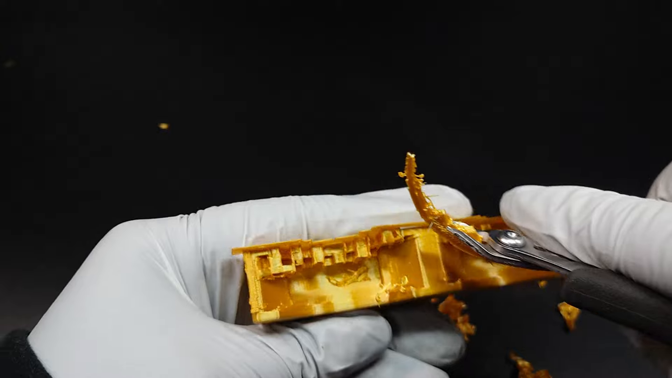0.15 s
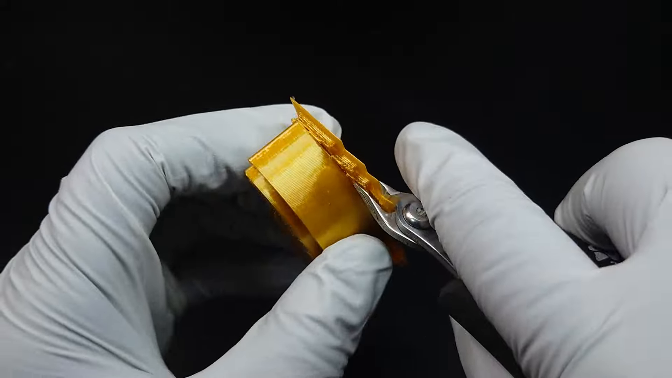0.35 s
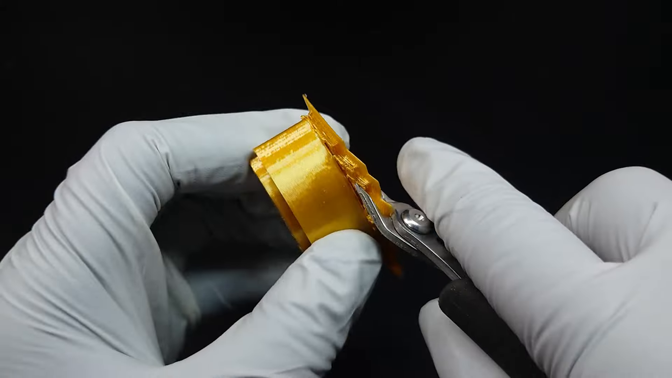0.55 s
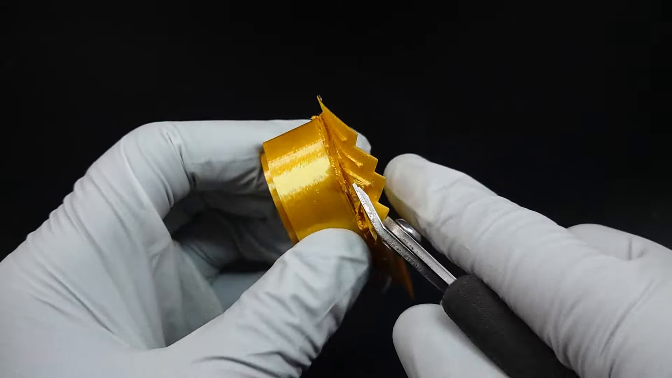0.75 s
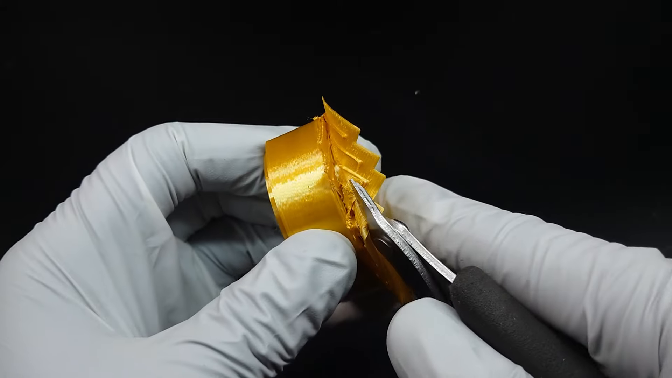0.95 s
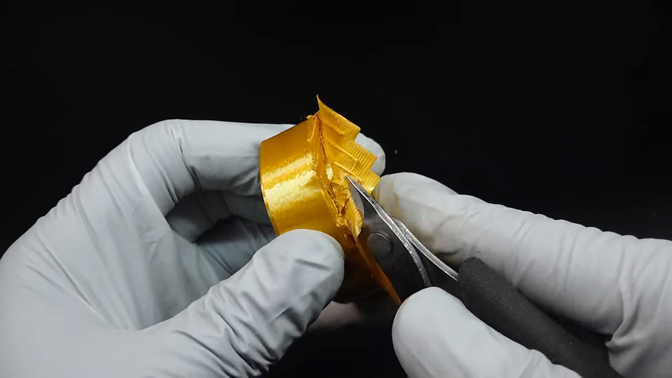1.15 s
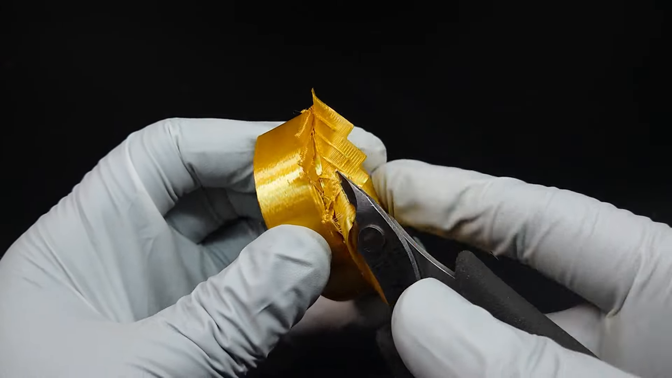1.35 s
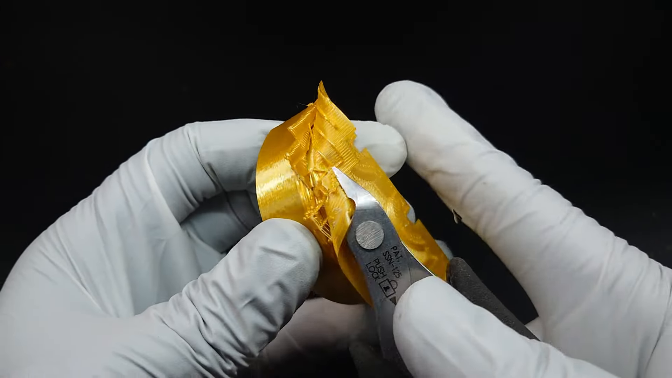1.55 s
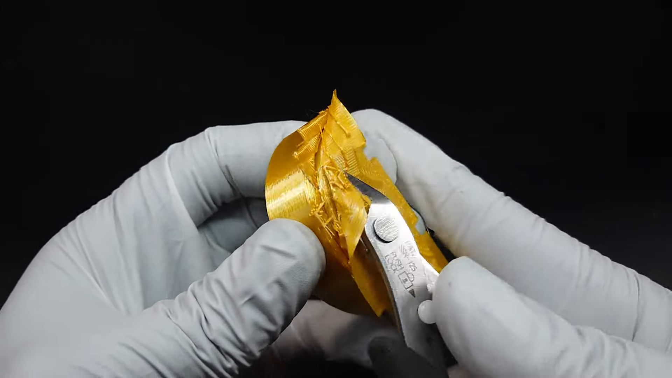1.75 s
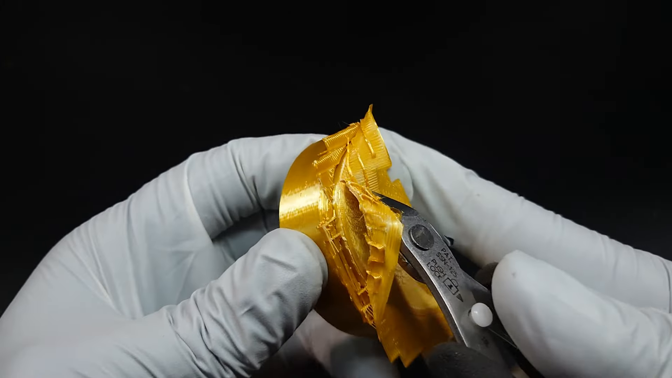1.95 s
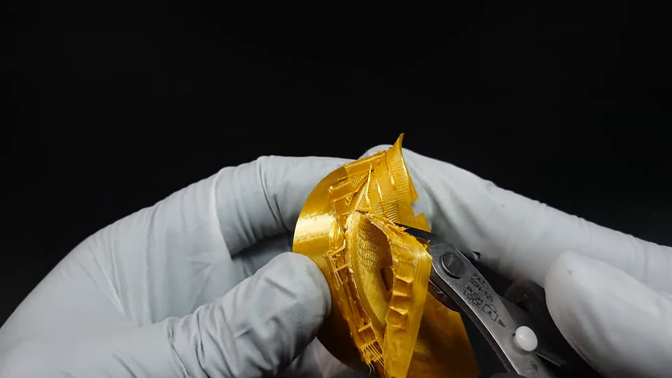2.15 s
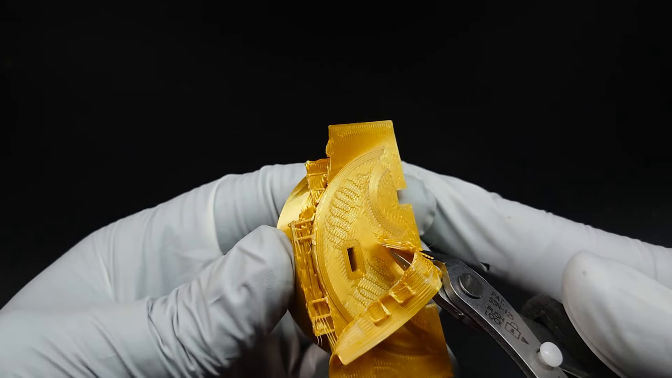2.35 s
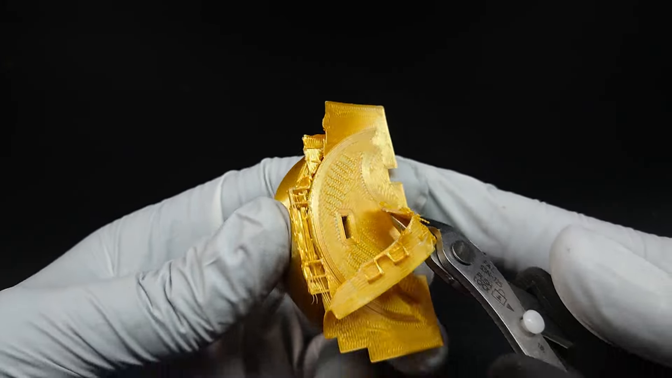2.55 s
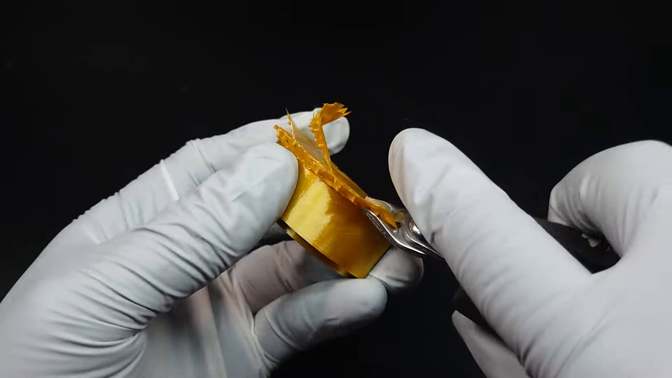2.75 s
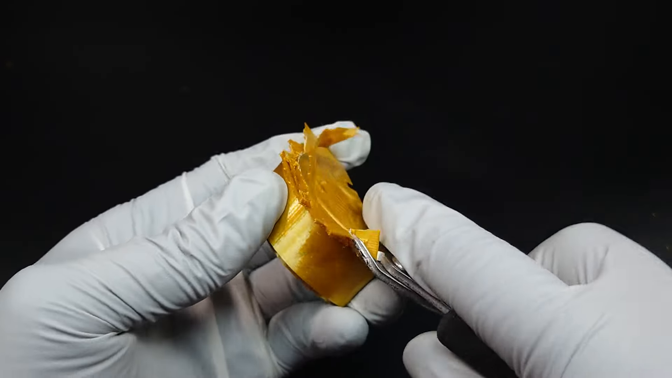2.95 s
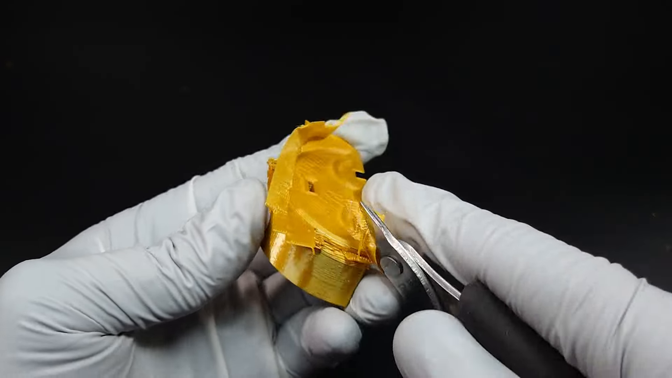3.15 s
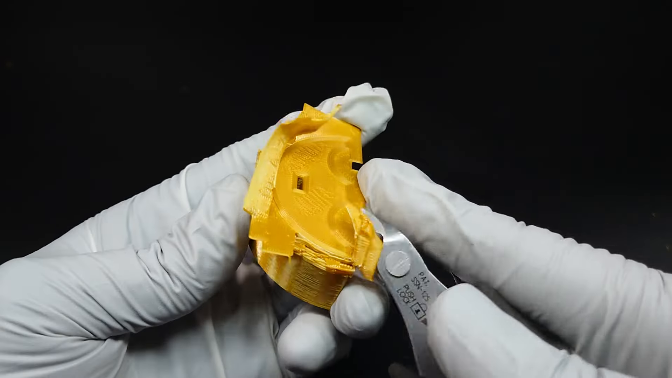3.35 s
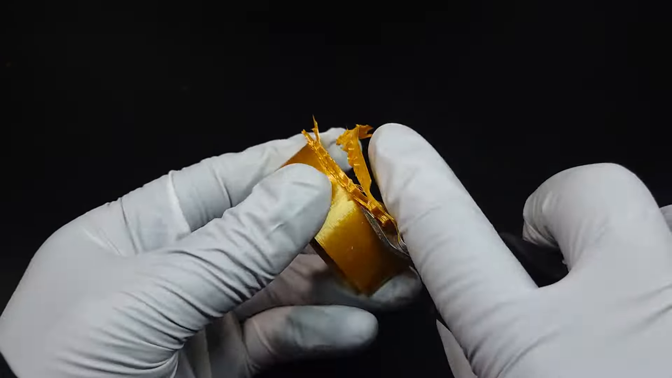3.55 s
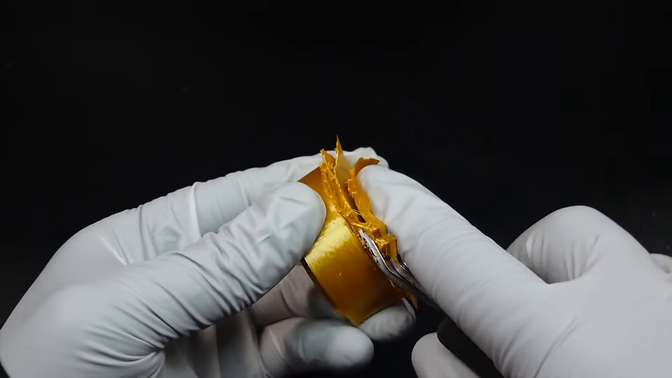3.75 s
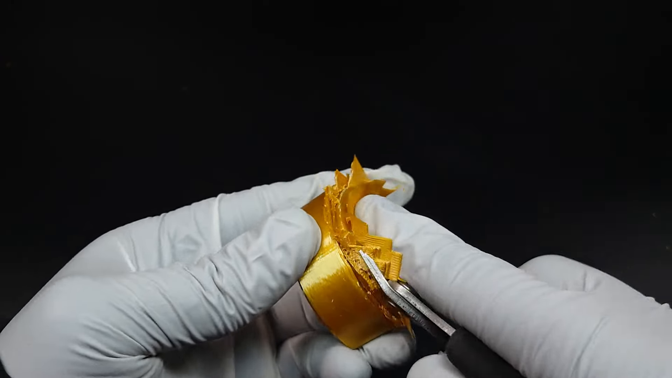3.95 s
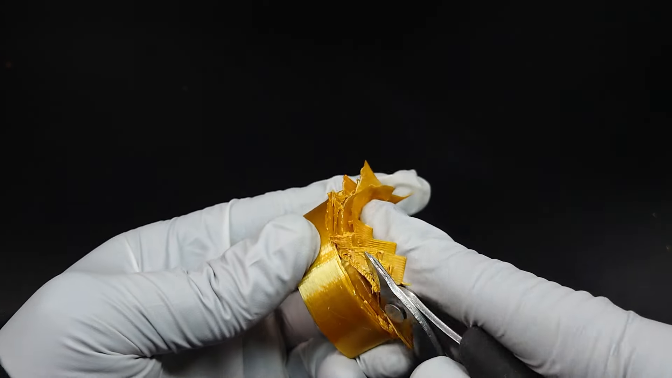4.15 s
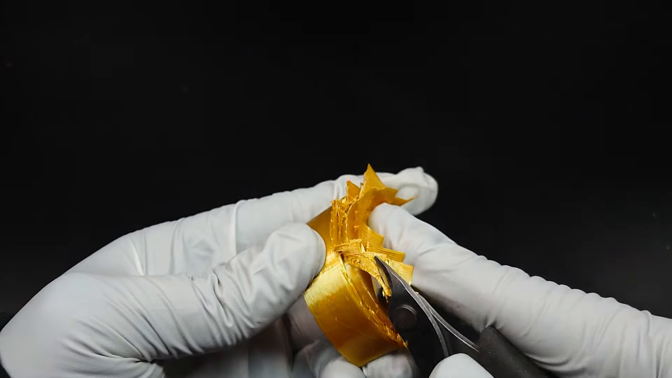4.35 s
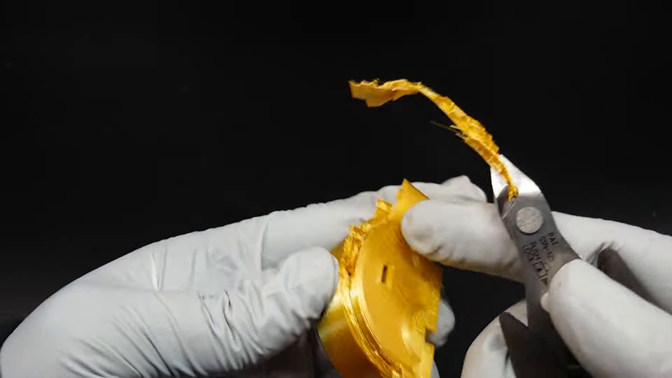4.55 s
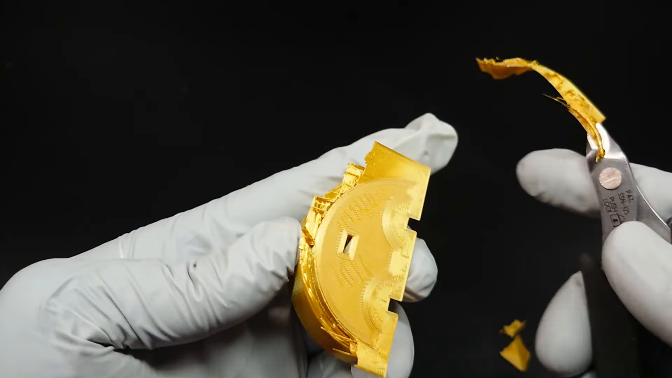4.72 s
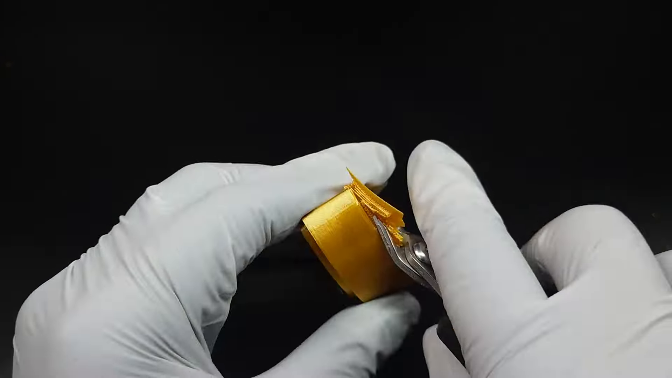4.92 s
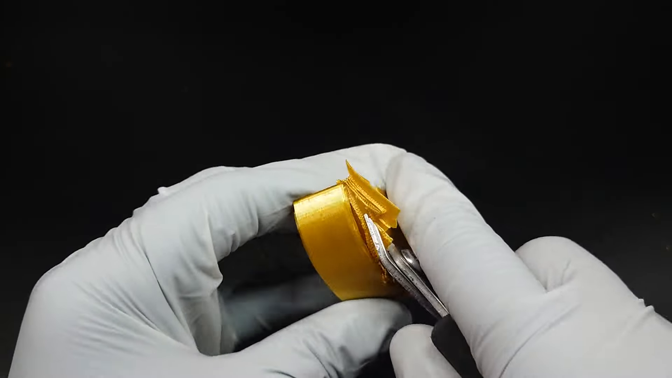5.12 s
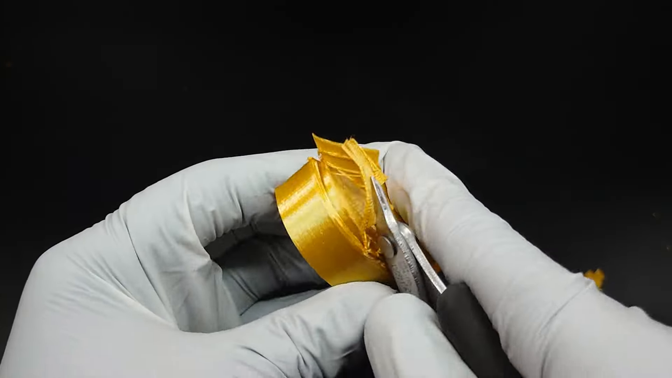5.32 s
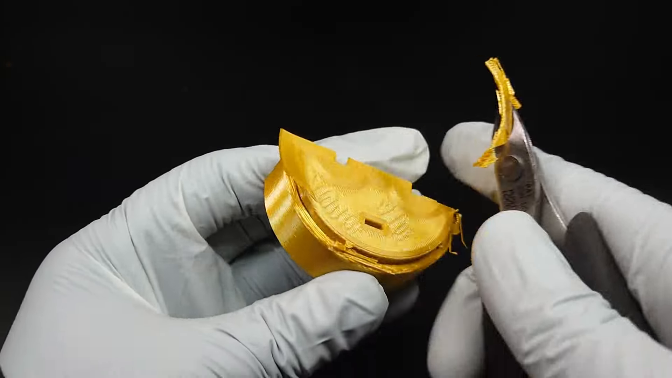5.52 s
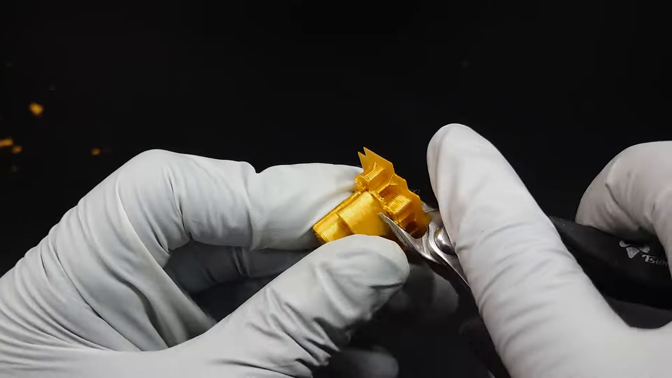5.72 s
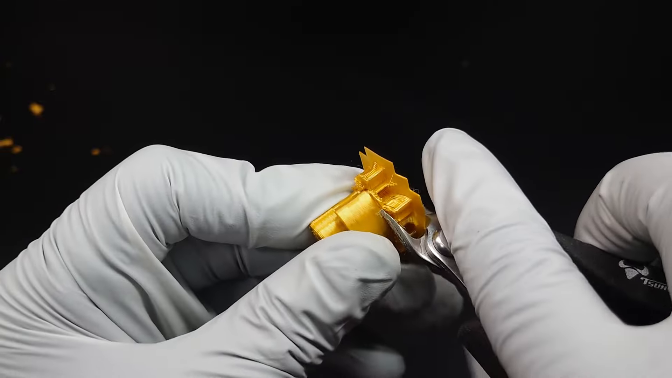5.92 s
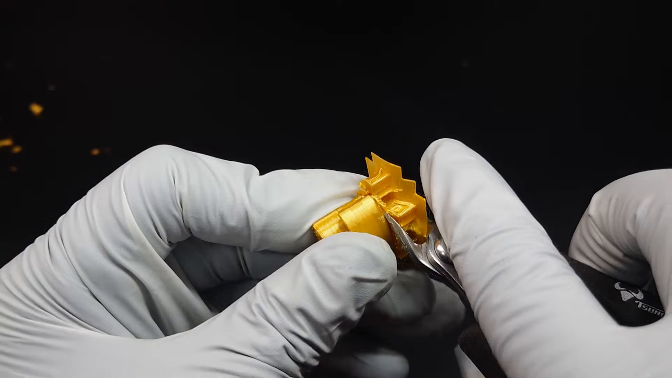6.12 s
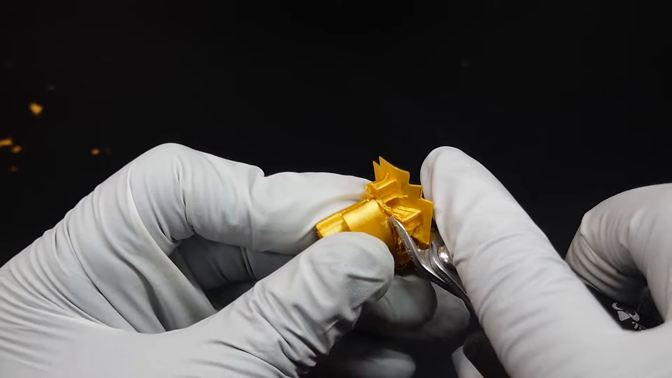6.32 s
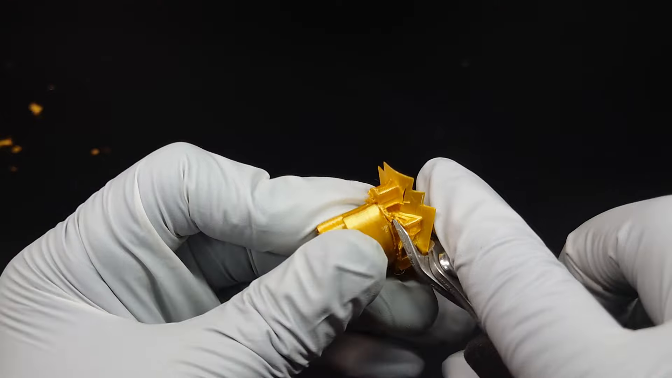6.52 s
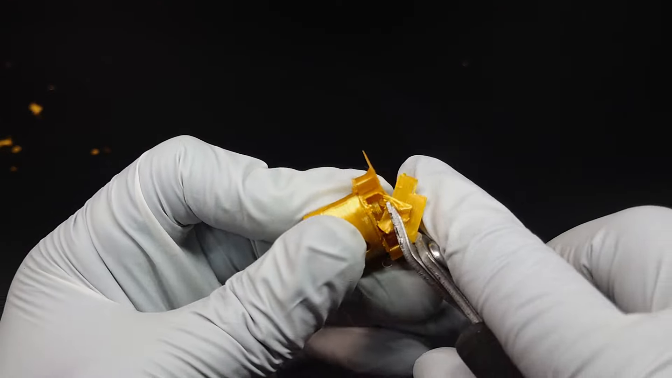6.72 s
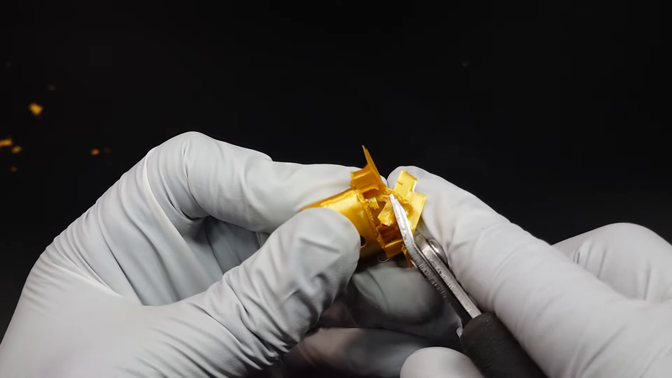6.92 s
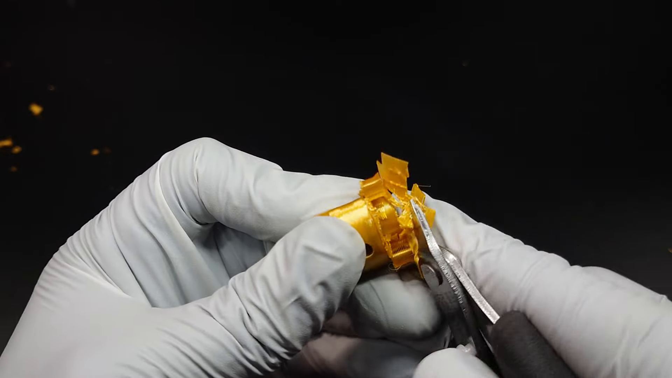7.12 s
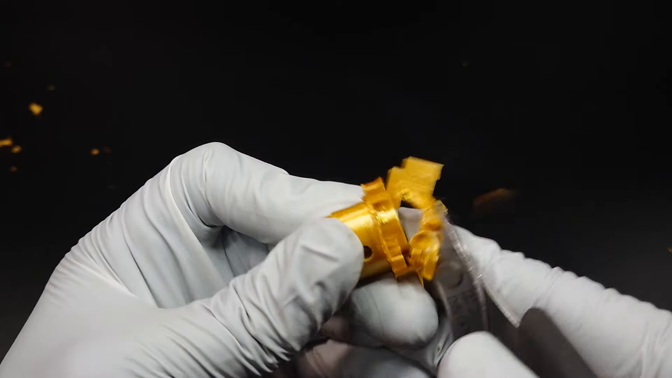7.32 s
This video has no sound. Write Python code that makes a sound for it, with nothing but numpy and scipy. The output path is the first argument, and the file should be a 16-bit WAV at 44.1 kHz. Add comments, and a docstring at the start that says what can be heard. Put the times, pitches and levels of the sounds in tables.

```python
"""Pliers breaking brittle plastic

Small pliers snap and tear supports off printed plastic parts, close to a stereo microphone on a workbench.
Each fracture is a noise burst of milliseconds that rings two modes of the piece and a small, dry room.
Between them come light ticks (jaw taps and small, weak cracks), creaking strands, hand thuds and glove rubs,
over hush and two thin tones.
The left microphone pops and rumbles, early and again near the end; the loudest peaks clip."""
import sys
import numpy as np
from scipy import signal
from scipy.fft import rfft, irfft
from scipy.io import wavfile
from scipy.ndimage import uniform_filter1d

SR = 44100
rng = np.random.default_rng(int(sys.argv[2]) if len(sys.argv) > 2 else 0)


def bounce(signal):
    """Save signal as a 16-bit WAV file at the path given by the first command-line argument."""
    frames = np.transpose(np.atleast_2d(signal))
    limited = np.clip(frames, -1, 1)
    pcm = np.round(limited * 32767).astype(np.int16)
    wavfile.write(sys.argv[1], SR, pcm)


N = 325458
CUTOFF_HZ = 15900
BURST = 2048  # samples that hold one crack
HZ = np.fft.rfftfreq(BURST, 1 / SR)

# fractures: start_s, level_db, decay_ms, body_db, brightness_db,
# low_ring_hz, low_ring_db, high_ring_hz, high_ring_db, left_minus_right_db
FRACTURES = [(0.4429, -4, 2.4, -11, 12.5, 4540, 10, 8020, 20.5, 10.5),
             (0.499, 2.5, 4.3, -9, -1, 4400, 25.5, 8020, 23.5, 5),
             (0.711, 15, 2, -14, -2, 2320, 19.5, 7650, 16.5, -0.5),
             (0.7706, 2.5, 1.9, -4, 7, 4560, 25, 7940, 27.5, -1),
             (0.821, 12, 4.3, -9, -4, 2970, 12, 8190, 12, -2.5),
             (0.9173, 8, 2.5, -24, 1, 4900, 21.5, 8780, 6.5, 1.5),
             (1.484, 9, 1.9, 8, 7.5, 2624, 15.5, 14660, 10, -5),
             (1.5055, -0.5, 3.7, -6, -6, 5200, 15.5, 8900, 7, 2),
             (1.8421, 6.5, 2.3, 12, 19, 4370, 9, 10500, 6, 2),
             (1.849, 3, 3.2, 1.5, 10.5, 2100, -1, 7300, 10, -14),
             (1.8594, 6, 1.8, -14, 23.5, 5700, 10, 7750, 35, -14.5),
             (1.9002, 9, 3.5, 14, 18.5, 2440, 14, 7900, 21, -3),
             (1.9305, 6, 1.5, -2.5, 8, 2230, 5, 8700, 13, -0.5),
             (2.143, 5, 2.9, -3.5, 2.5, 4630, 9.5, 10650, 8, -6),
             (2.2598, 4, 5.4, -7.5, 3, 4480, 0, 11650, 14.5, -4),
             (2.3492, 11.5, 4.1, 0.5, 11, 5770, 10, 10780, 9.5, 7),
             (2.3514, 9.5, 0.84, 24.5, 4.5, 3540, 11.5, 8300, 17.5, 2.5),
             (2.3572, -0.5, 3, 6.5, 13, 4450, -1.5, 7600, 42.5, 8),
             (2.8281, 11.5, 4.5, 0.5, 12.5, 4540, 6, 11900, 14.5, 0.5),
             (2.882, 11.5, 1, -14.5, -8, 4470, 15.5, 7780, 11.5, -1.5),
             (3.026, 9.5, 3, -10, -1, 4580, 9.5, 9900, 6.5, -1),
             (3.0868, 6, 3, -10, -4, 4400, 7, 9500, 9.5, 0),
             (3.1482, 13.5, 1.5, -2, 1, 5550, 12.5, 14400, 8, 3.5),
             (3.1528, 0.5, 2.9, 3, -8, 6140, 17.5, 14300.0, 17, -1),
             (3.4858, 4, 3.7, 0, -11, 4030, 15.5, 10200, 6.5, 5),
             (3.703, 2, 3.8, -18, -5, 2530, 11, 9260, 14, -2),
             (3.9102, 9, 1.9, -12.5, 5, 3850, 6, 10720, 8, 3),
             (4.042, -6.5, 1.3, -7, 1, 2670, 18.5, 8330, 14, 4),
             (4.0726, 7, 2.1, -5, -5.5, 3460, 8.5, 8100, 9, 3.5),
             (4.1839, 0, 2.9, -5, -2.5, 4270, 19, 9800, 8.5, 1),
             (4.296, 2.5, 2, 0, 6, 4280, 7.5, 14300, 7, 3.5),
             (4.3756, -11, 1.4, -21, 8, 4360, 29.5, 7380, 19, 3),
             (4.527, 14.5, 0.81, -8, 4.5, 3430, 9.5, 8030, 8.5, -4.5),
             (4.6205, -5.5, 3.8, 5, -12.5, 3960, 1, 8400, 13.5, -5),
             (4.9726, -8.5, 3.7, 4, 8.5, 888, 22, 7700, 6, 5),
             (5.0037, -3.5, 4.2, -7, 4.5, 4940, 4.0, 9540.0, 0, 5.5),
             (5.0275, -8, 4.9, -3, -12, 6400, 21, 10600, 15, -1),
             (5.046, 1, 2.9, -1.5, 6.5, 2600, 9, 9900, 12, 4),
             (5.0771, 2.5, 4.7, -5, -0.5, 3900, 10, 10350, 12, 0.5),
             (5.2373, 9, 3.2, -13, -8.5, 2770, 7, 14300.0, 6, 1),
             (5.2875, 11, 0.9, 7, 9.5, 2770, 9.5, 8030, 14, 2.5),
             (5.3466, 1, 3.7, 5.5, -5, 3480, 9, 9600, 2, 3.5),
             (5.4458, -2.5, 1.3, 1, -7, 4620, 6.5, 10400, 0.5, 3.5),
             (5.4756, 5, 8.1, 5.5, -1.5, 5750, 15, 14330, 11.5, 2.5),
             (5.783, -8.5, 2.8, -1.5, 16, 4650.0, 20.5, 13600, 14, 10.5),
             (5.8775, -6.5, 2, 1, 14.5, 4580, 27, 13300, 16.5, 12),
             (6.0111, -4, 1.94, -18, 13, 4630, 29, 12740, 12.5, 13),
             (6.2093, 3.5, 1.45, -18, 16.5, 4770, 26.5, 13660, 9.5, 4.5),
             (6.2434, 7.5, 3.5, -32.5, -1.5, 4610, 24.5, 8500, 6.5, 8),
             (6.2606, 2.5, 6.9, -10, -3, 2100, 16, 7700, 8, 2.5),
             (6.3353, 3, 3.6, -20, 5, 4550, 25, 8920, 10, 3.5),
             (6.491, -5.5, 2.5, -7.5, 0.5, 2220, 15, 7650, 7, 1.0),
             (6.6153, 0.5, 2.9, -1.5, 8.5, 5800, 11.5, 7660, -2, -0.5),
             (6.7118, 11, 0.65, -3.5, 0, 5320, 12.5, 13400, 6.5, -8.5),
             (6.93, 7.5, 1, -6, 26, 5150, 26, 8190, 29, 0),
             (7.1566, 5.5, 0.98, 15, 5.5, 5700, 19.5, 11020, 10.5, 11.5),
             (7.1751, 3.5, 6, -2, 6.5, 5730, 19.5, 10250, 12, 3.5)]


def from_db(db):
    """Decibels to amplitude gain."""
    return 10 ** (np.asarray(db) / 20)


def at_hz(points, hz):
    """Interpolate (Hz, value) points along a log-frequency axis."""
    log_hz, values = np.transpose([(np.log(f), v) for f, v in points])
    return np.interp(np.log(hz + 1), log_hz, values)


def add(out, start_s, sound):
    """Mix a sound in at a given time."""
    start = int(start_s * SR)
    out[..., start:start + sound.shape[-1]] += sound[..., :N - start]


def noise(spectrum, grains_per_s=SR):
    """Coloured noise of rms 1; at low rates it falls apart into separate grains."""
    grains = rng.standard_normal(N) * (rng.random(N) < grains_per_s / SR)
    gain = from_db(at_hz(spectrum, np.fft.rfftfreq(N, 1 / SR)))
    x = irfft(rfft(grains) * gain, N)
    return x / x.std()


def causal(gain_db):
    """Minimum-phase response with these gains: nothing sounds before the blow."""
    cepstrum = irfft(np.log(from_db(gain_db)))
    cepstrum[1:BURST // 2] *= 2
    cepstrum[BURST // 2 + 1:] = 0
    return np.exp(rfft(cepstrum))


def resonance(hz, lift_db, q):
    """Response of one damped mode standing out of a flat spectrum."""
    damping = 1j * HZ * hz / q
    return 1 + (from_db(lift_db) - 1) * damping / (hz ** 2 - HZ ** 2 + damping)


def delay(seconds):
    """Phase response of a pure delay."""
    return np.exp(-2j * np.pi * HZ * seconds)


def in_time(spectrum):
    """Waveform of a short burst, faded out from three fifths to four fifths of its length, silent after."""
    fade = np.clip(4 - 5 * np.linspace(0, 1, BURST), 0, 1)
    return irfft(spectrum) * fade


def room(x, build_s=0.0014, bass_db=6.5):
    """Diffuse reflections build up within milliseconds; the mids last longest and the bass is stronger."""
    # decay of the room: freq_hz, t60_s
    decay_times = [(150, 0.13), (2000, 0.22), (14000, 0.17)]
    t = np.arange(12288) / SR
    hz = np.fft.rfftfreq(len(t), 1 / SR)
    white = rfft(rng.standard_normal((2, len(t))))
    edges_hz = np.geomspace(40, 18000, num=9)
    response = np.zeros((2, len(t)))
    for low, high in zip(edges_hz, edges_hz[1:]):
        centre = np.sqrt(low * high)
        band = irfft(white * ((hz >= low) & (hz < high)), len(t))
        decay_db = -60 * t / at_hz(decay_times, centre)
        response += band * from_db(bass_db * (centre < 1000) + decay_db)
    response *= 1 - np.exp(-t / build_s)
    response /= np.sqrt(np.sum(response ** 2) / 2)  # unit energy per side on average
    return signal.fftconvolve(x, response, axes=1)[:, :N]


def hush(level_db=-66):
    """The room's hush: steady coloured noise, independent left and right."""
    # colour of the hush: freq_hz, density_db
    hush_colour = [(30, 6), (120, -6), (300, -11), (2300, -15.5), (6500, -27), (8500, -16.5), (16000, -34)]
    return from_db(level_db) * np.array([noise(hush_colour), noise(hush_colour)])


def electrical_tones():
    """Steady sines, alike on both sides."""
    # electrical tones: freq_hz, peak_db
    tone_table = [(590, -84), (10966, -78)]
    t = np.arange(N) / SR
    return sum(from_db(db) * np.sin(2 * np.pi * hz * t) for hz, db in tone_table)


def left_pops(swing=0.11, swing_hz=2.0, swing_s=0.16, onset_s=0.012, top_hz=1500):
    """Sudden offsets, sharp or dull, leak away and swing back slowly, over spells of faintly humming rumble."""
    # pops: start_s, signed_height, decay_s, edge_hz
    pop_table = [(0.8111, 0.04, 0.017, 500), (0.8215, -0.14, 0.0021, 606), (6.7117, 1.28, 0.00023, 900),
                 (6.8069, -0.4, 0.23, 160), (7.011, 0.025, 0.004, 199), (7.1577, 0.31, 0.008, 1190)]
    # spells of rumble: start_s, length_s, start_level_db, hum_db (hum peak relative to rumble rms)
    rumble_spells = [(0.709, .24, -26, -44), (6.706, 0.22, -18, -28.5), (6.957, 0.55, -24, -38.5)]
    # colour of the rumble: freq_hz, density_db
    rumble_colour = [(7, 2), (45, -26), (140, -39.5), (400, -51.5), (3000, -63.5)]
    hum_hz, fall_db_per_s, release_db_per_s = 387, 20.5, 490  # release adds to the fall after length_s
    t = np.arange(N) / SR
    out = np.zeros(N)
    rumble = noise(rumble_colour)
    hum = np.sin(2 * np.pi * hum_hz * t)
    for start_s, length_s, db, hum_db in rumble_spells:
        fall_db = fall_db_per_s * t + release_db_per_s * np.maximum(t - length_s, 0)
        envelope = from_db(db - np.minimum(fall_db, 120)) * np.minimum(t / onset_s, 1)
        humming = np.roll(rumble, -int(start_s * SR)) + from_db(hum_db) * hum
        add(out, start_s, envelope * humming)
    for start_s, height, decay_s, edge_hz in pop_table:
        leak = np.exp(-t / decay_s) + swing * np.exp(-t / swing_s)
        offset = leak * np.cos(2 * np.pi * swing_hz * t)
        edge = signal.butter(1, edge_hz, fs=SR, output="sos")
        add(out, start_s, height * signal.sosfilt(edge, offset))
    return signal.sosfilt(signal.butter(2, top_hz, fs=SR, output="sos"), out)


def hand_thuds(decay_s=0.034):
    """Hands jolt when a piece comes free: dull noise with a sudden onset and exponential decay."""
    # thuds: start_s, level_db
    thud_table = [(1.49, -58), (2.148, -54), (3.491, -48.5), (4.078, -54), (4.53, -48), (5.479, -38.5)]
    flesh = [(40, -3.0), (120, 6), (230, -19), (400, -6), (2500, -40.5)]  # freq_hz, density_db
    jolt = np.zeros(N)
    for start_s, db in thud_table:
        add(jolt, start_s, from_db(db) * np.exp(-np.arange(SR) / SR / decay_s))
    return jolt * noise(flesh)


def glove_rubs(width_s=0.049):
    """Gloves and jaws slide on the part, sticking and slipping in uneven grains; the room answers."""
    # rubs: centre_s, level_db
    rub_table = [(1.44, -56), (1.89, -60), (2.62, -74.5), (4.81, -69.5), (5.031, -59)]
    # colour of the rubs: freq_hz, density_db
    glove_colour = [(350, -24), (850, 1.5), (1400, 1), (2700, 7.5), (4800, -7), (6500, -39.5), (15000, -23)]
    t = np.arange(N) / SR
    slide = sum(from_db(db) * np.exp(-((t - centre_s) / width_s) ** 2) for centre_s, db in rub_table)
    slips = slide * np.array([noise(glove_colour, grains_per_s=450) for side in range(2)])
    return slips + .5 * room(slips)


def fracture(decay_ms, rise_s=.0001, ragged_db=6.0, apart=1.0, lag_s=0.000114,
             echo=0.64, echo_s=0.0017, spike=2.1, spike_s=0.00024):
    """Stereo spectrum of a crack through the layers: a ragged, dying burst with an echo off the bench."""
    t = np.arange(BURST) / SR
    knots = t[::24]
    jerks = np.interp(t, knots, rng.standard_normal(len(knots)))
    envelope = (1 - np.exp(-t / rise_s)) * np.exp(-1000 * t / decay_ms) * from_db(ragged_db * jerks)
    envelope *= 1 + spike * np.exp(-t / spike_s)  # most of the strain lets go at once
    grit = rng.standard_normal(BURST) + apart * rng.standard_normal((2, BURST))
    bursts = rfft(envelope * grit)
    # a brittle break spreads its energy evenly over the frequencies
    bursts /= np.sqrt(uniform_filter1d(np.abs(bursts) ** 2, size=25) + 1e-18)
    bursts[1] *= delay(lag_s * (.5 + rng.random()))  # right microphone a little farther away
    return bursts * (1 + echo * delay(echo_s * (.5 + rng.random())))


def piece(body_db, bright_db, rings, bass_share=0.16, mids_share=0.46):
    """Colour and modes (hz, lift_db, q) of a piece, unit power: thick ones have body, sharp edges top."""
    # colour of breaking plastic: freq_hz, density_db
    plastic = [(70, -18.5), (300, -29.5), (470, -26), (900, -19.5), (1700, -13.5), (3000, -12), (4500, -9),
               (6400, -18.5), (7800, -7), (10300, -6), (15000, -8)]
    size_db = at_hz([(280, bass_share * body_db), (850, body_db),
                     (2600, mids_share * body_db), (7000, 0.0011)], HZ)
    edge_db = at_hz([(8000, 0.0051), (14000, bright_db)], HZ)
    colour = causal(at_hz(plastic, HZ) + size_db + edge_db)
    modes = 0
    for hz, lift_db, q in rings:
        strength = np.interp(hz, HZ, np.abs(colour))
        modes = modes + (resonance(hz, lift_db, q) - 1) * strength
    power = np.mean((np.abs(colour) ** 2 + np.abs(modes) ** 2) * (HZ < CUTOFF_HZ))
    return np.array([colour, modes]) / np.sqrt(power)


def tick(db, decay_ms=1.0, jaw_hz=4550, jaw_db=7, rib_db=9, q=12, body_db=-6.0, bright_db=0.0):
    """A faint, short burst rings a fixed mode of the jaws and a random one of a rib."""
    rib_hz = rng.uniform(2500, 10000)
    colour, modes = piece(body_db, bright_db, [(jaw_hz, jaw_db, q), (rib_hz, rib_db, q)])
    return from_db(db) * in_time(fracture(decay_ms) * (colour + modes))


def light_ticks(tick_db=5.5):
    """Light ticks: jaw taps and small, weak cracks of the plastic."""
    # light ticks: start_s, relative_level_db
    tick_table = [(1.04, -26.5), (1.1373, -27.5), (1.1968, -27.5), (1.2112, -32), (1.3509, -26.5),
                  (1.402, -34.5), (1.423, -31.5), (1.4442, -20.5), (1.4586, -27.5), (1.6357, -21),
                  (1.6841, -33), (1.7494, -18), (1.8315, -21.5), (2.056, -36.5), (2.1038, -29.5),
                  (2.121, -26), (2.7807, -19), (2.928, -13), (3.0758, -13), (3.185, -13.5), (3.271, -25),
                  (3.3357, -30), (3.3513, -27.5), (3.5754, -18), (3.6601, -15.5), (3.7885, -22),
                  (3.974, -24.5), (4.3535, -28), (4.418, -19), (4.4898, -19.5), (4.5595, -15.5),
                  (4.9486, -31), (4.98, -17), (5.1486, -19), (5.317, -11), (5.741, -34), (5.8285, -28.5),
                  (6.5997, -23), (6.8019, -20), (6.903, -22.5), (7.0124, -23.5), (7.2613, -23.5)]
    out = np.zeros((2, N))
    for start_s, db in tick_table:
        add(out, start_s, tick(db + tick_db))
    return out


def strands(lead_s=0.0016, lead_db=-20, after_s=0.022, after_db=-21,
            strain_s=0.13, creak_db=-40, spread_db=4, count=2):
    """Strained plastic creaks before each fracture, a strand gives way just ahead, the last tear after."""
    out = np.zeros((2, N))
    for start_s, db, *_ in FRACTURES:
        add(out, start_s - lead_s * (0.37 + rng.random()), tick(db + lead_db))
        for before, after, size in rng.random((count, 3)):
            size_db = spread_db * (2 * size - 1)
            add(out, start_s - strain_s * before, tick(creak_db + size_db))
            add(out, start_s + after_s * after, tick(db + after_db + size_db))
    return out


def cracks(low_q=22, sharpen=.4, high_q=27, release_s=.0005, ring_db=2.5,
           level_db=-0.88, room_db=-11, room_share=0.89, thick_dry=.17):
    """Each break has its colour and rings two modes, a stronger low one purer; loud, thick ones are drier."""
    # the holding hand shades the left microphone in the mids: freq_hz, left_minus_right_db
    hand_shade = [(700, 2), (2400, -9.5), (5000, -1), (10000, 0)]
    # the hollow printed part rings under every crack: freq_hz, lift_db, q
    shell_mode = (856, 6, 6)
    out = np.zeros((2, N))
    sides = np.array([causal(side * at_hz(hand_shade, HZ) / 2) for side in (1, -1)])
    shell = resonance(*shell_mode)
    for (start_s, db, decay_ms, body_db, bright_db,
         low_hz, low_db, high_hz, high_db, pan_db) in FRACTURES:
        purity_q = low_q * from_db(sharpen * (low_db - 16))
        colour, modes = piece(body_db, bright_db, [(low_hz, low_db, purity_q), (high_hz, high_db, high_q)])
        burst = in_time(fracture(decay_ms) * colour * shell * sides)
        release = delay(release_s * (.5 + rng.random((2, 1))))
        ring = from_db(ring_db) * in_time(release * modes * sides)
        pan = from_db([[pan_db / 2], [-pan_db / 2]])
        add(out, start_s, from_db(db + level_db) * (burst + ring) * pan)
        wet_db = room_share * db + room_db - thick_dry * max(body_db, 0)
        add(out, start_s, from_db(wet_db) * room(burst + ring))
    return out


def scene(tick_room_db=-11):
    """Close cracks and ticks in a small room, with hands, hush, tones and the left microphone's pops."""
    ticks = light_ticks() + strands()
    out = hush() + electrical_tones() + hand_thuds() + glove_rubs()
    out += ticks + from_db(tick_room_db) * room(ticks)
    out += cracks()
    out[0] += left_pops()
    return out


def record(dry):
    """The loudest cracks overload the input; the top is cut."""
    low_pass = signal.ellip(10, .2, 70, CUTOFF_HZ, fs=SR, output="sos")
    return signal.sosfilt(low_pass, np.clip(dry, -.95, .95))


dry = scene()
out = record(dry)
bounce(out)
```